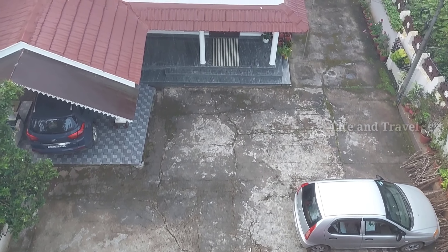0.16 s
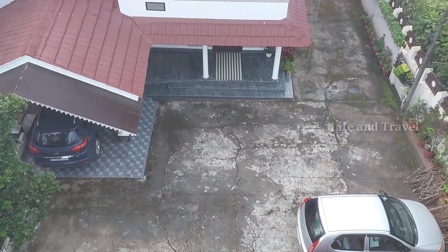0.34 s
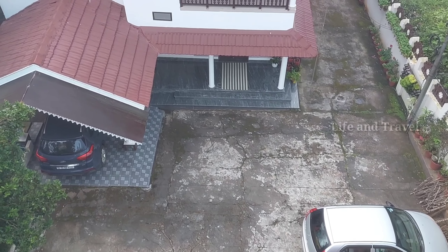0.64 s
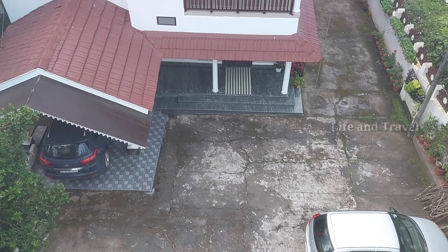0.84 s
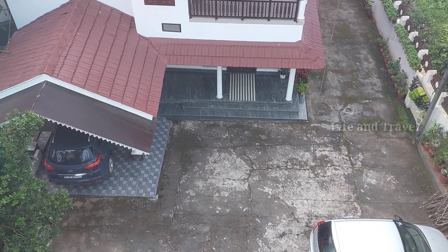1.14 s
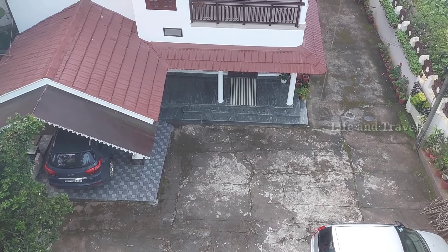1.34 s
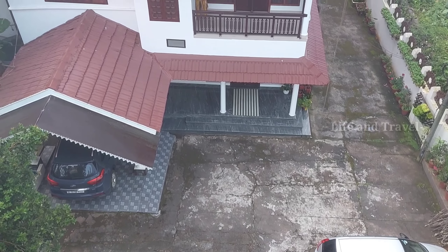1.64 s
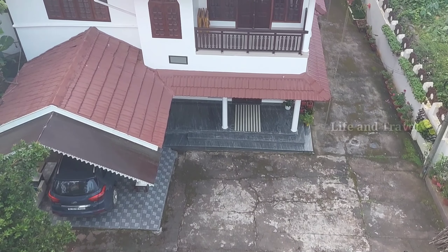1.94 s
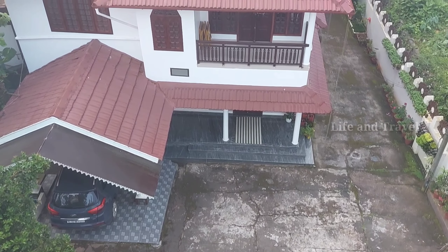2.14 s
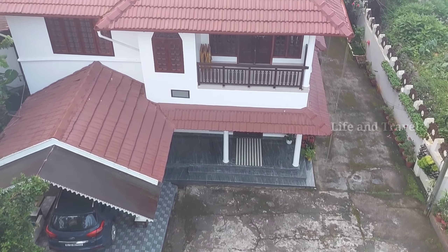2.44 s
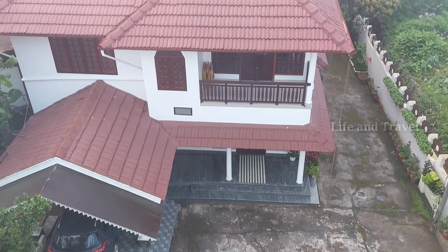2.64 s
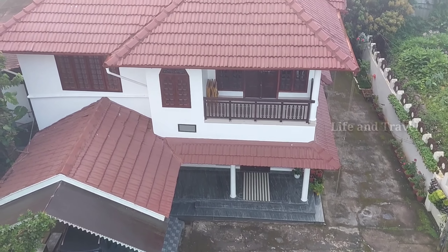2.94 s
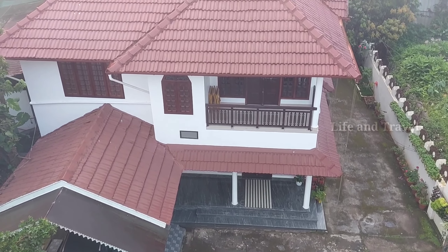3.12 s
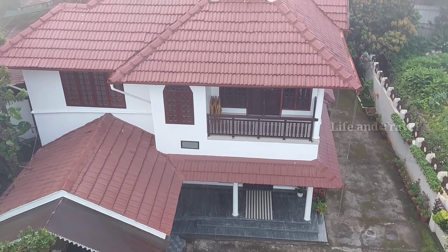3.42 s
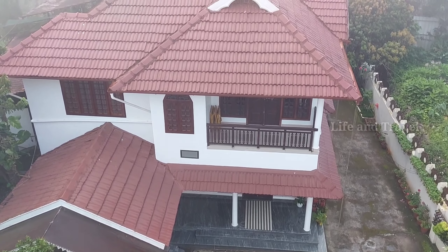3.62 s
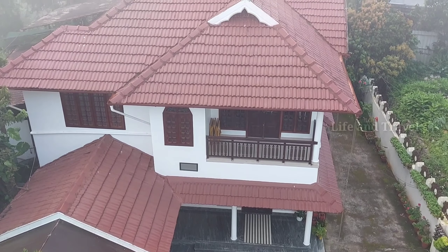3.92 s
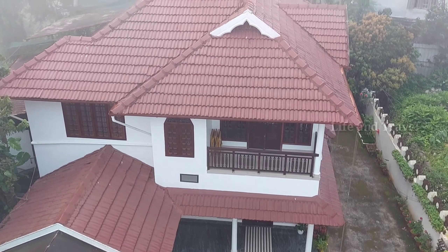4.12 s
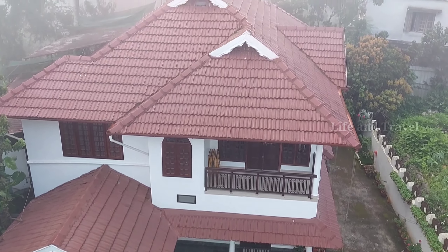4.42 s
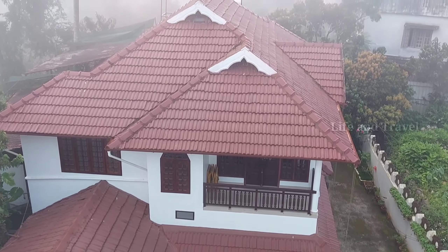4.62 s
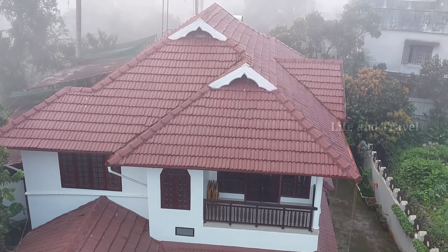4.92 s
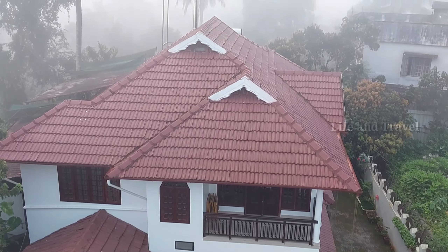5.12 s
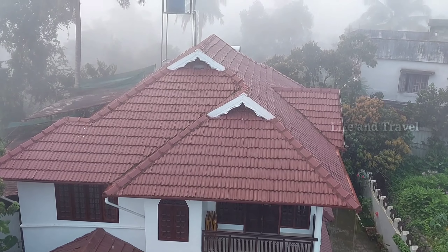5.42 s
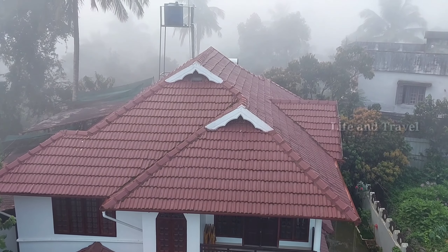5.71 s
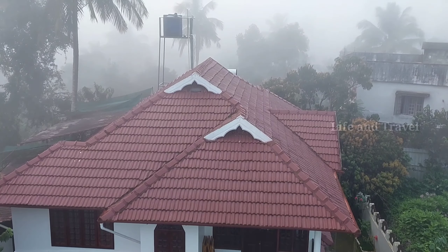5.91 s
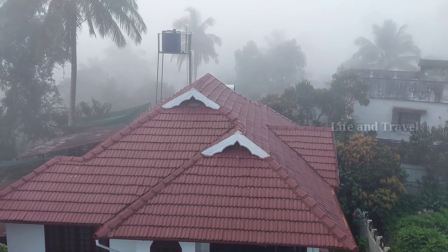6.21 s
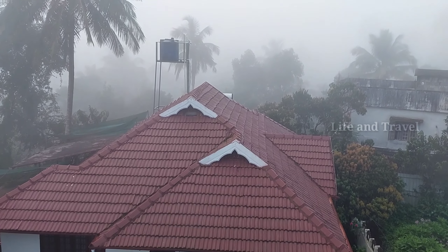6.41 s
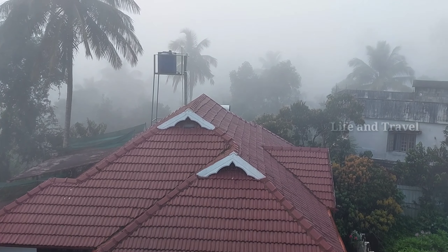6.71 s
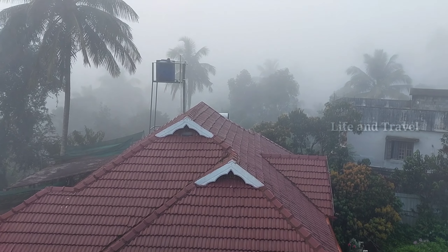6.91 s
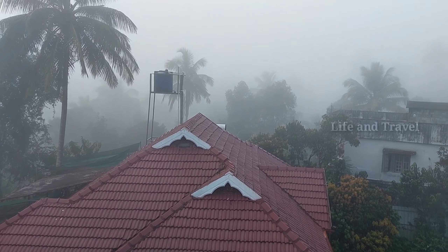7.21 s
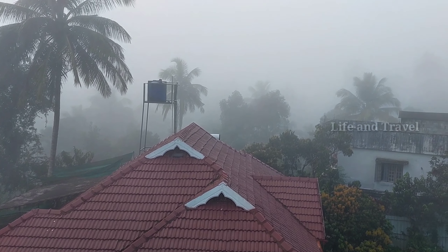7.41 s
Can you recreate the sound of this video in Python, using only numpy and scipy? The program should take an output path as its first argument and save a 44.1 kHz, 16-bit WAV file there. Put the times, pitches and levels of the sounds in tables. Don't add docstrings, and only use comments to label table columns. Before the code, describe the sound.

Small garden birds twitter and whistle over rumbling distant traffic, with gravelly rustles, three throaty purrs from a larger bird, and hard stone knocks.

```python
import sys
import numpy as np
from scipy import signal
from scipy.fft import rfft, irfft, next_fast_len
from scipy.io import wavfile
from scipy.ndimage import uniform_filter1d

SR = 44100
rng = np.random.default_rng(int(sys.argv[2]) if len(sys.argv) > 2 else 0)


def field_ratio(decibels):
    return 10 ** (np.asarray(decibels, dtype=float) / 20)


def wrap_up_sound(samples):
    columns = np.atleast_2d(samples).T
    tamed = np.clip(columns, -1, 1)
    steps = np.round(tamed * 32767).astype(np.int16)
    wavfile.write(sys.argv[1], SR, steps)


N = 333175
T = np.arange(N) / SR
STEP = 32


def colour(x, points):
    hz, db = np.transpose(points)
    size = next_fast_len(x.shape[-1])
    at = np.log(np.fft.rfftfreq(size, 1 / SR) + 1)
    gain = field_ratio(np.interp(at, np.log(hz), db, -99, -99))
    return irfft(rfft(x, size) * gain, size)[..., :x.shape[-1]]


def unit(x):
    return x / np.sqrt(np.mean(x ** 2))


def walk(rate_hz):
    k = int(SR / rate_hz)
    held = np.repeat(rng.standard_normal(N // k + 1), k)
    return 1.322 * uniform_filter1d(uniform_filter1d(held, k), k)[:N]


def add(out, s, sound):
    i = int(s * SR)
    out[i:i + len(sound)] += sound[:N - i]


def tone(hz, db, waver_db):
    return np.sqrt(2) * field_ratio(db + waver_db) * np.sin(2 * np.pi * np.cumsum(hz) / SR)


def placed(x, pan_db, lag):
    return np.array([np.roll(x, lag) * field_ratio(pan_db), x])


def notes(table, waver_db, edge):
    out = np.zeros(N)
    for s, length_s, start_hz, middle_hz, end_hz, db in table:
        u = np.linspace(0, 1, int(length_s * SR))
        hz = start_hz * (2 * u - 1) * (u - 1) + 4 * middle_hz * u * (1 - u) + end_hz * u * (2 * u - 1)
        breath = signal.windows.tukey(len(u), edge)
        add(out, s, tone(hz, db, waver_db[int(s * SR):][:len(u)]) * breath)
    return out


def bent(table, bend):
    return [(s, length_s, bend[0] * hz, hz, bend[1] * hz, db) for s, length_s, hz, db in table]


def glides(tables, waver_db, edge_s, rough):
    out = np.zeros(N)
    for table in tables:
        s, hz, db = np.transpose(table)
        on = (T > s[0]) & (T < s[-1])
        t = T[on]
        gate = np.clip(np.minimum(t - s[0], s[-1] - t) / edge_s, 0, 1)
        out[on] += gate * tone(rough[on] * np.interp(t, s, hz), np.interp(t, s, db), waver_db[on])
    return out


def town():
    # frequency in Hz, density in dB per Hz.
    spectrum = [(20, -43), (40, -6.5), (74, -1), (125, -2.5), (180, -6.5), (330, -11.5), (530, -20),
                (920, -24), (2100, -23.5), (3600, -31), (5250, -35), (5500, -43), (7300, -47), (8000, -49)]
    # frequency in Hz, left minus right in dB.
    ports_db = [(60, -4), (110, -2), (200, 0), (380, -3.5), (700, 0.5), (1290, -7.5), (2380, -10),
                (4400, -5.5), (8120, -1), (15000, -7.0)]
    # nearest (or deepest) in seconds, spread in
    # seconds, register in Hz, spread in octaves, gain in dB (negative for a dip).
    vehicles = [(0.01, 0.35, 160, 1.66, 8), (2.7, 1.8, 2180, 0.7, 7), (3.09, 2.3, 230, 2.05, 5.5),
                (4.68, 1.26, 57, 1.35, 6), (1.6, 0.48, 112, 0.79, 3), (3.19, 0.25, 970, 0.46, 9),
                (3.1, 2.1, 34, 0.74, 10), (1.42, 0.33, 2200, 0.56, 2.5), (5.1, 1.6, 1630, .4, 3),
                (6.2, 0.27, 47, 1.2, -4), (6.15, 0.21, 2200, 0.65, -1.5)]
    ports_apart_m, sound_m_per_s = 0.16, 343
    road_share, road_lag_s, road_top_hz = .45, .00043, 3500
    size = next_fast_len(N)
    hz = np.fft.rfftfreq(size, 1 / SR)
    around = (1 - road_share) * np.sinc(2 * hz * ports_apart_m / sound_m_per_s)
    road = road_share / (1 + (hz / road_top_hz) ** 4) * np.exp(-2j * np.pi * hz * road_lag_s)
    alike = .98 * (around + road)
    mid, side = rfft(colour(rng.standard_normal((2, size)), spectrum))
    pair = np.array([alike * mid + np.sqrt(1 - np.abs(alike) ** 2) * side, mid])
    port_hz, port_db = np.transpose(ports_db)
    lean_db = np.interp(np.log(hz + 1), np.log(port_hz), port_db)
    pair = pair * field_ratio(np.array([lean_db, -lean_db]) / 2)
    nearness = [np.exp(-((T[::STEP] - s) / spread_s) ** 2) for s, spread_s, *_ in vehicles]
    out = 0
    for centre in np.arange(4, 13.4, 1 / 2):
        window = np.cos(np.pi / 2 * np.clip(2 * (np.log2(hz + 1) - centre), -1, 1)) ** 2
        db = 1.38 * walk(6)[::STEP]
        for near, (_, _, register_hz, octaves, gain_db) in zip(nearness, vehicles):
            reach = np.exp(-((centre - np.log2(register_hz)) / octaves) ** 2)
            db = db + gain_db * reach * (near - near.mean())
        out = out + np.repeat(field_ratio(db), STEP)[:N] * irfft(pair * window, size)[:, :N]
    return unit(out) * field_ratio(-37.5)


def engine_hums():
    # time in seconds, pitch in Hz, level in dB.
    hums = [
        [(0.0, 77.2, -51), (2.21, 78.9, -47), (2.25, 68.1, -42), (4.79, 70.06, -41), (7.55, 80.85, -49.5)],
        [(0.0, 120.7, -51.5), (3.78, 116.2, -36), (4.37, 127, -56), (4.64, 110.5, -40.5), (7.55, 117.7, -49)],
        [(1.0, 131.4, -47.5), (3.27, 138.3, -36), (3.7, 137, -39), (3.85, 135.1, -51.5), (5.0, 129, -56)],
        [(0.0, 403.2, -56.5), (6.81, 399.8, -54), (7.55, 393, -78)],
    ]
    sound = glides(hums, 3.13 * walk(9), 0.19, 1 + 0.00996 * walk(5))
    return placed(sound, -0.8, lag=7) * field_ratio(-2.5)


def rustle():
    # peak in seconds, rise and fall in seconds per 20 dB, hiss in dB,
    # crunch in dB against the hiss.
    swells = [(.07, 0.61, 0.3, -71.5, 4.5), (.33, 0.19, 1, -71, -1), (1.03, 0.17, 0.5, -67.5, 1.5),
              (1.72, 0.2, 0.15, -70.5, 3.5), (1.86, .2, 0.5, -68.5, -1), (2.05, 0.85, 2.5, -74, -16),
              (2.46, .06, 0.4, -63.5, 0), (3.12, .4, 2, -73.5, 3), (3.28, .3, 0.5, -75, -10),
              (3.769, 0.091, 0.23, -60.5, 0.5), (4.23, 0.2, .5, -63, -5.5), (4.45, 0.19, 1.3, -71.5, 2.5),
              (5.03, 0.0018, 0.08, -60, 2), (5.066, 0.03, 0.14, -52.5, -5), (5.17, 0.11, 0.5, -67, -7),
              (5.73, 0.18, 0.34, -64, -1), (6.359, 0.025, 0.15, -63.5, 3.5),
              (6.409, 0.049, 0.08, -58.5, -1), (6.66, 0.13, 2, -64.5, -6), (7.04, 0.16, 0.1, -59, -7),
              (7.0, 1.33, 0.7, -64.5, -3)]
    # frequency in Hz, density in dB per Hz.
    hiss_spectrum = [(7600, -21), (8400, -8.5), (9200, -6.5), (12000, -5), (14500, -8), (15600, -5.5)]
    crunch_spectrum = [(50, -8), (250, 8), (700, -2), (1500, -0.5), (3000, -0.5), (5000, -3.5),
                       (6000, -7.5), (7500, -12.5), (8200, -42)]
    grains = rng.standard_normal((3, N)) * field_ratio(2.13 * rng.exponential(1, (3, N)) + 0.83 * walk(300))
    both = placed(grains[0], 0, lag=-19) + 1.23 * grains[1:]
    hiss_gain, crunch_gain = field_ratio(-79.5), 0
    t = T[::STEP]
    for s, rise_s, fall_s, db, crunch_db in swells:
        swell = field_ratio(db - 20 * np.maximum((s - t) / rise_s, (t - s) / fall_s))
        hiss_gain = np.hypot(hiss_gain, swell)
        crunch_gain = np.hypot(crunch_gain, swell * field_ratio(crunch_db))
    hiss = np.interp(T, t, hiss_gain) * unit(colour(both, hiss_spectrum))
    crunch = np.interp(T, t, crunch_gain) * unit(colour(both, crunch_spectrum))
    return (field_ratio(5.5) * hiss + field_ratio(21.0) * crunch) * field_ratio(np.array([[-9.], [0]]))


def ticks():
    # time in seconds, peak in dB.
    snaps = [(.0164, -51), (.9807, -43), (1.027, -38), (1.043, -42), (1.8537, -40), (2.4309, -43),
             (2.452, -35), (2.476, -44), (2.492, -42), (2.5207, -41), (2.5411, -45), (2.5606, -45),
             (2.604, -50), (3.7319, -47), (3.7428, -42), (3.7543, -37), (3.7585, -40), (3.7637, -30),
             (5.029, -42), (5.0577, -36), (5.3884, -53), (5.7351, -35), (5.7774, -38), (6.35, -50),
             (6.389, -34), (6.4073, -31), (6.4144, -31), (6.422, -38), (6.4325, -39), (6.4435, -36),
             (7.011, -38), (7.0388, -32), (7.0425, -35), (7.0454, -31), (7.051, -40)]
    # time in seconds, peak in dB.
    knocks = [(1.0425, -40), (5.031, -37), (5.0363, -33), (5.0493, -34), (5.0555, -33), (5.058, -29),
              (5.063, -27), (5.066, -30), (5.07, -30), (5.073, -27.5), (5.0787, -28), (5.087, -33),
              (3.75, -38), (3.7983, -40), (6.3575, -36), (6.385, -36), (6.39, -34), (6.422, -37),
              (6.429, -33)]
    out, t = np.zeros(N), np.arange(400) / SR

    def ring(x, hz, q):
        return signal.lfilter(*signal.iirpeak(hz, q, SR), x)

    for s, db in snaps:
        crack = rng.standard_normal(400) * np.exp(-t / 0.0012)
        snap, knock = ring(crack, 8000, .6), ring(crack, 2400, 1.6)
        add(out, s, field_ratio(db + 3.5) * (snap / np.abs(snap).max() + knock / np.abs(knock).max()))
    for s, db in knocks:
        blow = rng.standard_normal(400) * np.exp(-t / 0.0018)
        blow = signal.lfilter(*signal.butter(3, 5000, fs=SR), blow)
        knock = ring(blow, 2400, 4) + .8 * ring(blow, 4100, 4)
        thud = np.sin(2 * np.pi * 420 * t) * np.exp(-t / 0.0035)
        add(out, s, field_ratio(db + 6.5) * (knock / np.abs(knock).max() + field_ratio(-9.5) * thud))
    return placed(out, -13.5, lag=-17)


def chirps(curve, low_hz):
    s, length, pitch, bend, size = rng.random((300, 5)).T
    hz = low_hz + 1500 * pitch
    table = np.transpose([7.4 * s, .02 + .06 * length, hz * (.95 + .35 * bend), hz, .93 * hz, 12 * size])
    return unit(notes(table, 0 * T, 0.45)) * field_ratio(np.interp(T, *np.transpose(curve)) - 3.5)


def far_chorus():
    # time in seconds, level in dB.
    low_curve = [(0.0, -73), (0.29, -45), (1.45, -60), (4.02, -53.5), (6.39, -66), (6.58, -49), (7.55, -51)]
    high_curve = [(0.0, -74), (0.35, -53), (1.2, -60), (1.6, -70), (3.1, -64.5), (5.0, -71), (6.4, -68),
                  (6.62, -52), (7.55, -63)]
    return chirps(low_curve, 3700) + chirps(high_curve, 5300)


def far_whistles():
    # time in seconds, pitch in Hz, level in dB.
    whistles = [
        [(.15, 4700, -51), (.2, 4970, -51), (.26, 5260, -51.5), (.32, 5700, -59)],
        [(2.72, 5010, -61), (2.81, 4990, -55), (2.855, 4950, -51), (2.89, 5090, -59), (2.945, 5970, -63)],
        [(3.02, 6200, -73.5), (3.04, 6350, -68), (3.1, 5950, -62)],
        [(4.685, 4850, -56), (4.75, 5280, -58), (4.82, 5700, -57), (4.93, 5860, -69)],
        [(6.3, 4890, -60), (6.37, 4810, -51), (6.44, 4830, -48), (6.475, 5200, -54), (6.53, 6340, -60)],
    ]
    return field_ratio(3.0) * glides(whistles, 1.4 * walk(200), 0.0059, 1 + 0.013 * walk(300))


def purring_bird():
    # start in seconds, length
    # in seconds, middle pitch in Hz, level in dB.
    clucks = [
        (3.27, 0.029, 1500, -41),
        (3.775, 0.0394, 1500, -43),
        (4.315, 0.08, 1400, -46),
        (3.06, 0.15, 935, -51),
        (3.262, 0.027, 860, -43),
        (5.388, 0.0034, 1920, -36.5),
    ]
    coos = [
        (3.305, 0.07, 1005, -43),
        (3.3, 0.085, 883, -40),
        (3.51, 0.029, 883, -42),
        (3.38, .07, 915, -52),
        (5.387, .0056, 2670, -36),
    ]
    # start in seconds, length in seconds, first throat pitch in Hz, level in dB.
    purrs = [
        (3.082, 0.18, 1465, -40),
        (3.578, 0.163, 1470, -39),
        (4.125, 0.19, 1390, -43.5),
    ]
    end_hz, pulse_hz, fade_db, plain_db = 1290, 96, 1.3, -2
    out = notes(bent(clucks, (1.09, 0.88)) + bent(coos, (1, 1)), 1.8 * walk(80), 0.21)
    for s, length_s, first_hz, db in purrs:
        u = np.clip((T - s) / length_s, 0, 1)
        gate = np.clip(np.minimum(u, 1 - u) * length_s / 0.022, 0, 1)
        beat = np.cumsum(pulse_hz * (1 + 0.024 * walk(40))) / SR
        since_s = beat % 1 / pulse_hz
        hz = first_hz + (end_hz - first_hz) * u
        pulses = np.sin(2 * np.pi * hz * since_s) * np.sin(np.pi * (beat % 1)) ** .7
        plain = np.clip((u - .68) / .1, 0, 1)
        whistle = field_ratio(plain_db) * np.sin(2 * np.pi * np.cumsum(hz) / SR)
        level = field_ratio(db - fade_db * u + 11.5 + 2.3 * walk(90))
        out += gate * level * ((1 - plain) * pulses + plain * whistle)
    return out


def twitter():
    # start in seconds, length in seconds, middle pitch in Hz, level in dB.
    falls = [(.095, 0.015, 3780, -53), (.361, .012, 3200, -52), (.337, 0.016, 3370, -41.5),
             (.353, .013, 3520, -53), (1.815, 0.02, 3650, -48.5), (2.09, 0.025, 3500, -51),
             (3.389, .033, 3490, -54), (3.934, 0.0112, 3430, -44), (3.945, .012, 3300, -55),
             (4.022, 0.016, 4300, -47), (4.185, .007, 3550, -44), (4.212, .008, 2800, -50),
             (4.095, .008, 3910, -46), (5.68, .01, 4100, -56), (5.551, 0.02, 3940, -45.5),
             (6.752, 0.025, 5750, -59), (6.785, 0.018, 3630, -47), (6.918, 0.023, 4000, -55),
             (6.81, .012, 3400, -52), (7.203, 0.02, 3400, -47.5), (7.502, .024, 3640, -47.5)]
    droops = [
        (6.774, .014, 4150, -51),
        (1.794, .041, 3650, -54),
        (3.901, 0.028, 3965, -39),
        (4.164, 0.022, 3810, -39),
        (5.623, 0.0068, 3950, -49),
        (5.996, 0.036, 3740, -43.5),
        (6.062, 0.013, 2390, -47.5),
    ]
    rises = [(.285, 0.021, 2960, -53), (.337, .014, 4500, -49), (5.74, .019, 3290, -41),
             (5.824, .01, 4500, -51), (1.783, .011, 4750, -49), (4.08, 0.016, 3950, -46),
             (4.451, 0.021, 3110, -43), (4.487, 0.019, 3110, -41), (5.707, 0.022, 3500, -44.7),
             (6.049, .013, 2720, -43.5), (4.51, 0.011, 3400, -48)]
    hooks = [
        (4.197, .01, 3030, -40),
        (6.035, 0.0094, 3110, -42),
        (6.971, .021, 3300, -41.5),
        (7.39, 0.024, 3260, -44),
    ]
    arches = [(.312, 0.015, 3300, -40.5), (4.476, 0.0129, 3550, -41), (4.46, .007, 3800, -45),
              (6.96, 0.018, 3500, -45), (7.36, .016, 3550, -42), (1.609, 0.011, 3690, -53),
              (3.419, 0.01, 3300, -49), (3.433, .008, 3050, -50), (3.445, .012, 3150, -48),
              (4.232, 0.025, 3010, -48), (4.0, .024, 4400, -49), (5.521, 0.018, 5800, -55),
              (5.727, 0.0135, 4030, -48), (7.381, 0.0063, 3890, -43.5)]
    scoops = [
        (5.84, 0.025, 3620, -45.5),
        (6.629, .03, 3840, -54.5),
    ]
    return (bent(falls, (1.17, 0.736)) + bent(droops, (1.025, 0.9)) + bent(rises, (.9, 1.06))
            + bent(hooks, (0.92, 1.32)) + bent(arches, (.83, 0.825)) + bent(scoops, (1.17, 1)))


def near_birds():
    # time in seconds, pitch in Hz, level in dB.
    slides = [
        [(.06, 4700, -50), (.068, 3950, -41.5), (.087, 3350, -42), (.095, 2600, -50)],
        [(1.152, 5100, -49), (1.185, 4050, -42.5), (1.205, 3400, -49), (1.235, 2700, -53)],
        [(3.095, 6000, -57), (3.113, 5340, -50), (3.15, 4550, -45), (3.175, 3840, -43), (3.205, 2750, -52)],
        [(3.834, 2700, -48), (3.846, 3550, -45), (3.86, 3850, -45), (3.874, 3800, -44), (3.884, 3000, -50)],
        [(6.638, 6950, -52), (6.658, 6680, -42.5), (6.682, 5600, -45)],
        [(6.697, 5350, -50), (6.715, 4930, -41), (6.745, 4150, -45), (6.778, 3150, -51)],
        [(7.066, 6700, -53), (7.088, 5900, -44), (7.135, 5000, -42), (7.172, 4360, -43)],
    ]
    # start in seconds, length in seconds, start and end pitch in Hz, level in dB.
    sweeps = [(0.43, 0.04, 6300, 6300, -58), (0.456, 0.046, 6700, 4500, -54),
              (.678, 0.057, 5200, 2800, -52), (0.77, 0.047, 6500, 5550, -57), (.885, .04, 5050, 3800, -54),
              (0.96, 0.034, 6700, 5600, -59), (3.835, 0.092, 5400, 3000, -53),
              (6.0, 0.026, 7800, 7050, -61), (5.979, 0.017, 6700, 5000, -63), (7.48, .014, 5600, 3580, -53),
              (4.425, .02, 5950, 5700, -56), (7.523, .025, 5200, 3000, -56), (6.75, .05, 6200, 5000, -59),
              (4.138, .008, 6400, 5700, -60), (4.148, .008, 6300, 5600, -58),
              (2.665, .014, 3000, 2500, -48), (3.81, .03, 5900, 5350, -60),
              (5.585, 0.0071, 3000, 3700, -53), (4.245, .016, 3300, 2600, -50)]
    # start in seconds, length in seconds, pitch in Hz, level in dB.
    flat_notes = [(1.175, .045, 3070, -48), (2.464, .016, 5080, -44), (2.478, .03, 4950, -49),
                  (1.46, .11, 5200, -62), (2.961, 0.0036, 3100, -36.5), (2.965, .04, 5330, -54),
                  (3.687, .083, 5300, -56.5), (4.272, 0.041, 5200, -50), (4.33, 0.018, 5640, -54),
                  (4.445, 0.0135, 5090, -38), (0.065, 0.04, 5300, -57), (.028, .02, 4600, -51),
                  (.24, .13, 5050, -52.5), (.27, .04, 5000, -49), (.37, 0.19, 5100, -59),
                  (.262, .012, 4100, -52), (.302, .01, 3750, -49), (.296, .008, 3050, -47),
                  (6.94, .018, 3170, -42), (7.075, .055, 5000, -57), (5.83, .016, 5110, -48),
                  (6.2, .012, 4900, -46), (6.694, 0.011, 4500, -50), (4.508, 0.085, 3282, -48.5),
                  (5.8, .012, 2950, -48), (5.808, .01, 2400, -49), (5.822, .01, 3150, -46),
                  (1.12, .035, 2900, -51), (5.9, .01, 6600, -58), (5.678, .06, 5160, -54),
                  (5.848, 0.07, 5090, -58), (5.92, .06, 5100, -65), (5.878, .035, 3200, -48),
                  (5.915, 0.053, 2900, -53), (5.9, .08, 3560, -58), (4.46, 0.16, 5150, -60),
                  (2.615, .03, 5100, -56), (2.5, .06, 5000, -56), (6.5, .09, 4850, -56),
                  (6.72, .14, 5050, -59), (6.379, 0.06, 4090, -50.5), (6.488, 0.046, 5100, -61),
                  (6.58, 0.054, 6850, -63), (7.09, .15, 4630, -55)]
    straight = [(s, length_s, a, (a + b) / 2, b, db) for s, length_s, a, b, db in sweeps]
    trill = [(.32 + k * .0233, .01, 6170, -45 - k) for k in range(5)]
    scatter_db = 2.6 * walk(220)
    out = field_ratio(-1) * glides(slides, scatter_db, 0.0027, 1 + 0.0044 * walk(250))
    out += field_ratio(2.0) * notes(straight, scatter_db, 0.42)
    out += field_ratio(3.5) * notes(twitter(), scatter_db / 2, 0.4)
    out += notes(bent(flat_notes, (1, 1)), 0.93 * scatter_db, 0.3)
    return out + notes(bent(trill, (.95, 1.04)), 0 * T, 0.52)


def trees(x, t60_s, leaves_db):
    t = np.arange(SR) / SR
    decay = np.exp(-np.log(1000) * t / t60_s)
    leaves = field_ratio(leaves_db) * np.exp(-t / .012)
    tail = rng.standard_normal((2, SR)) * (decay + leaves) * (t > .002)
    tail = tail / np.sqrt(np.sum(tail[0] ** 2))
    return signal.fftconvolve(x[None], tail, axes=1)[:, :N] * field_ratio(np.array([[-7.], [0]]))


def scene():
    background = town() + engine_hums() + rustle() + ticks()
    far, large, near = far_whistles(), purring_bird(), near_birds()
    birds = placed(near, -11, lag=-20) + placed(far, -10, lag=14) + placed(large, -5, lag=-21)
    near_echoes = trees(field_ratio(-7) * near + field_ratio(-5) * large, .42, 0)
    far_echoes = trees(field_ratio(2) * far + far_chorus(), .7, 0)
    return background + birds + near_echoes + far_echoes


def thinned(x):
    # frequency in Hz, bar in dB against the level nearby.
    thin_db = [(20, -60), (1500, -26), (2600, -19), (5000, -14), (6000, -9), (7200, -2), (7900, 3),
               (8300, 8), (8800, 3), (9500, 2), (13000, 3), (14700, 4), (15350, 15), (22000, 18)]
    lead = 1024 - 303
    n, line = np.arange(2048), np.arange(1024)
    window = np.sin(np.pi * (n + .5) / 2048)[:, None]
    basis = window * np.cos(np.pi / 1024 * np.outer(n + 512.5, line + .5))
    blocks = np.pad(x, ((0, 0), (lead, 2048 - (N + lead) % 1024))).reshape(2, -1, 1024)
    z = np.concatenate([blocks[:, :-1], blocks[:, 1:]], axis=2) @ basis
    nearby = uniform_filter1d(np.abs(z), size=61, axis=2)
    patches_db = np.repeat(3.5 * rng.standard_normal((2, z.shape[1], 64)), 16, axis=2)
    patches_db = patches_db + 2.5 * rng.standard_normal((z.shape[1], 1))
    hz = (line + .5) * SR / 2048
    left_db = np.array([5, 0])[:, None, None] * (hz < 7500)
    bar_db = np.interp(hz, *np.transpose(thin_db)) + patches_db + left_db
    kept = (z * (np.abs(z) > nearby * field_ratio(bar_db))) @ basis.T / 512
    first = np.pad(kept[..., :1024], ((0, 0), (0, 1), (0, 0)))
    second = np.pad(kept[..., 1024:], ((0, 0), (1, 0), (0, 0)))
    return (first + second).reshape(2, -1)[:, lead:][:, :N]


def band_limit(x):
    return signal.sosfilt(signal.butter(12, 15630, fs=SR, output="sos"), x)


def record(dry):
    mix = thinned(dry)
    return band_limit(mix)


dry = scene()
out = record(dry)
wrap_up_sound(out)
```